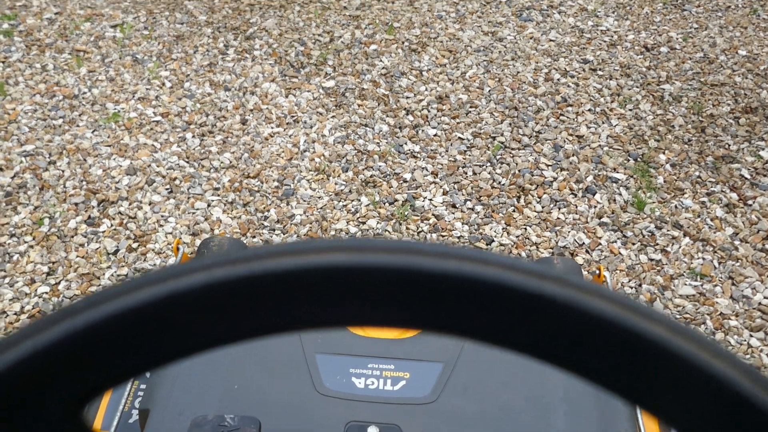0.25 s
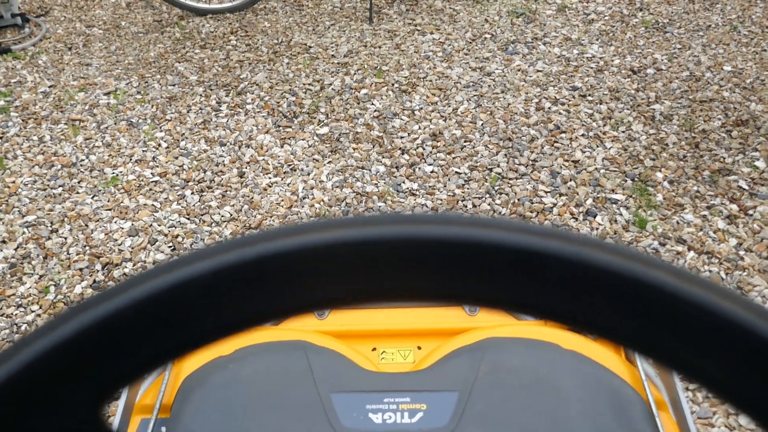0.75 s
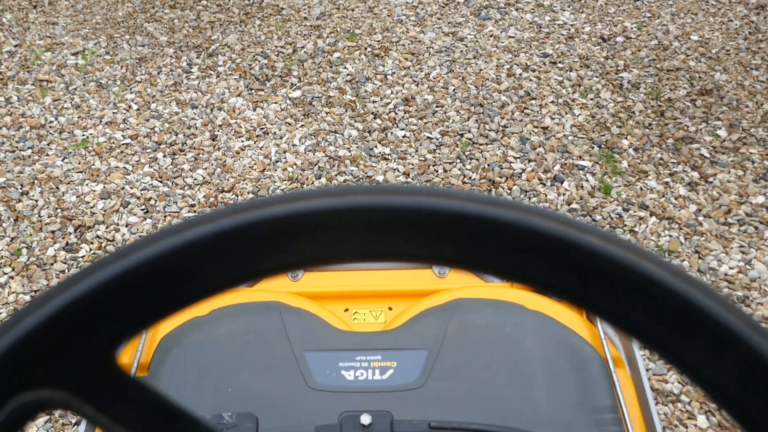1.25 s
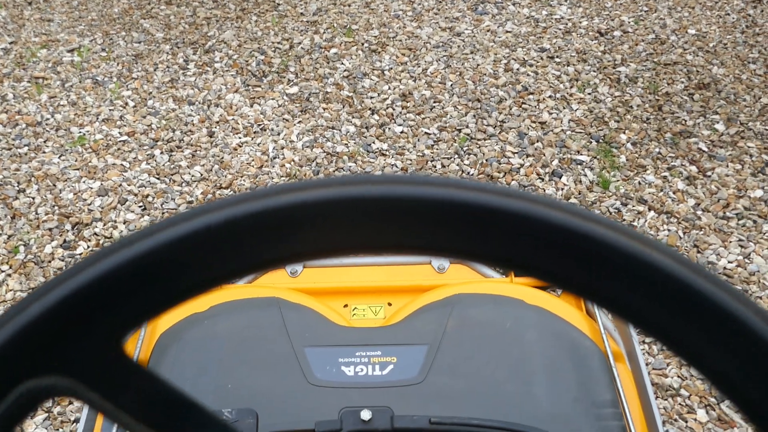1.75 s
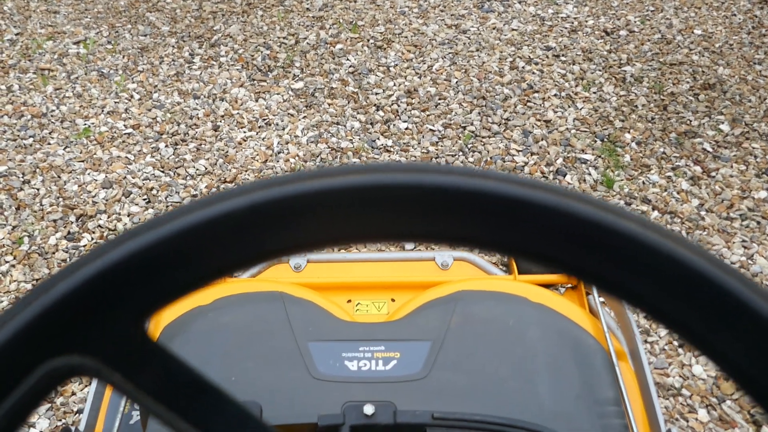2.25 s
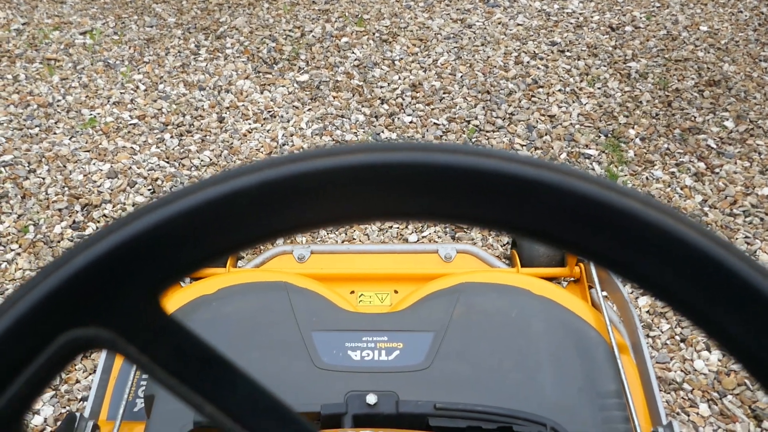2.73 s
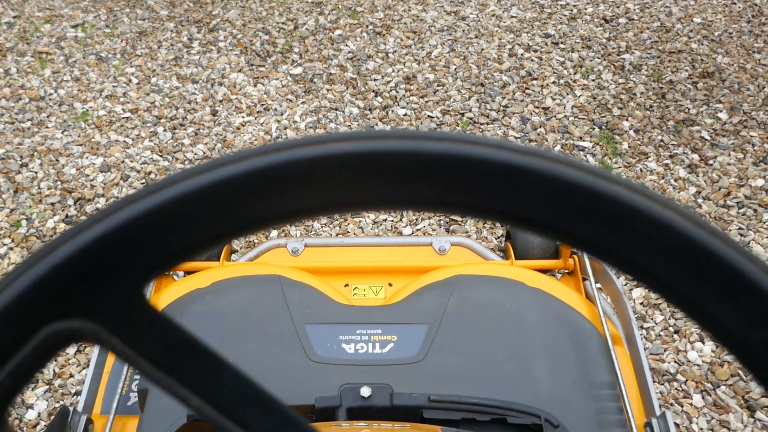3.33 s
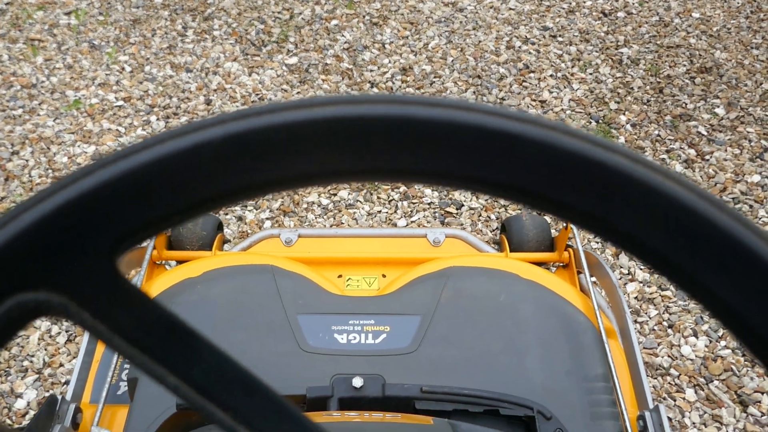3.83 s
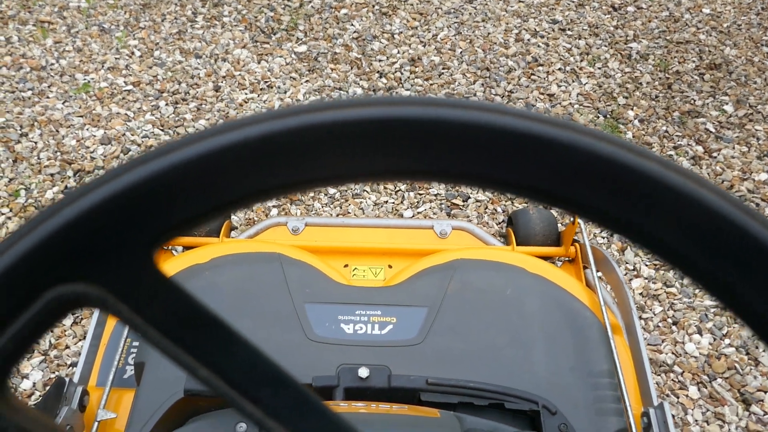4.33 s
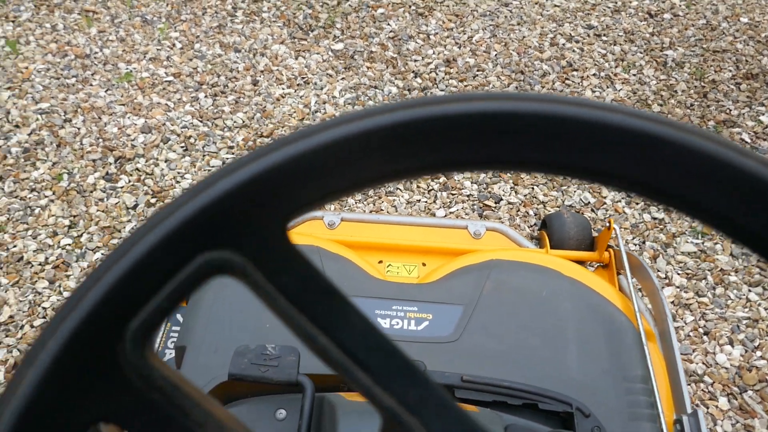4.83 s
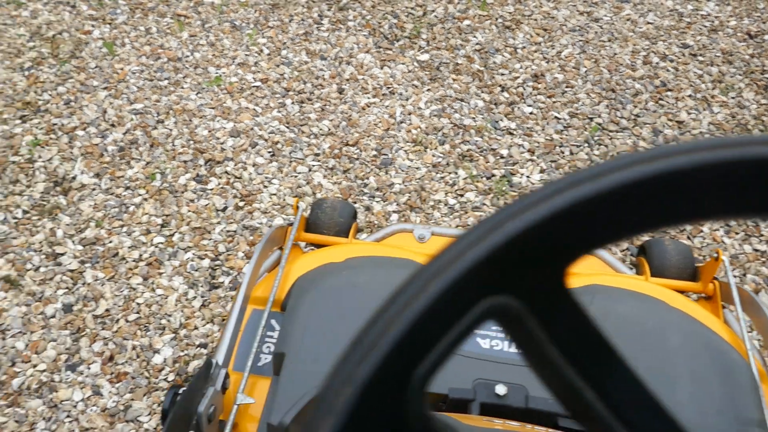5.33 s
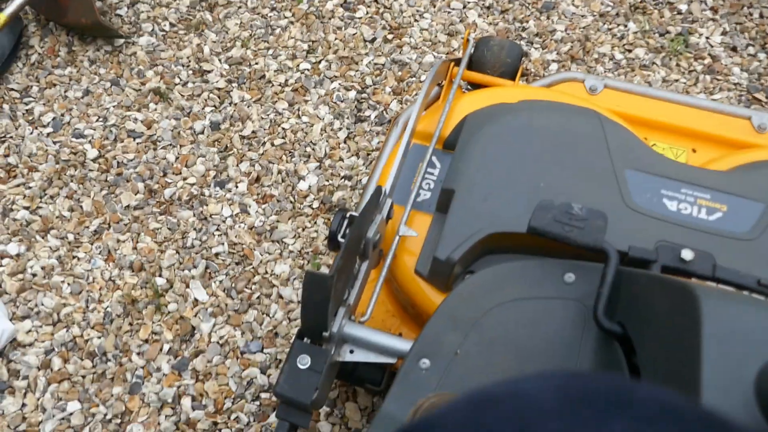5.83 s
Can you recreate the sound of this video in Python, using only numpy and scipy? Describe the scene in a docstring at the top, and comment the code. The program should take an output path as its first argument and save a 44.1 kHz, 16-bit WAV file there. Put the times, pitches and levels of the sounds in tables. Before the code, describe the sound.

After a few hollow knocks, a small petrol ride-on mower cranks, catches, idles and speeds up, chugging and clattering.

```python
"""A gravel yard, from the seat of a standing ride-on mower. The driver knocks about on the controls,
the starter grinds, and the one-cylinder petrol engine catches, idles, then pulls up to working speed
in two steps. Each cycle is a low intake gulp and a ringing exhaust beat, over clatter, rattling covers,
a belt hum and a hiss of air. Near the end the driver leans out to the left with a gritty rustle,
and the beat grows fainter."""
import sys
import numpy as np
from scipy import signal
from scipy.fft import rfft, irfft
from scipy.io import wavfile
from scipy.ndimage import uniform_filter1d

SR = 44100
rng = np.random.default_rng(int(sys.argv[2]) if len(sys.argv) > 2 else 0)


def wav_out(sig):
    """Save sig, one row per channel (or a flat mono array), as 16-bit PCM at SR to the path in sys.argv[1]."""
    wavfile.write(sys.argv[1], SR, np.round(np.clip(np.atleast_2d(sig).T, -1, 1) * 32767).astype(np.int16))


N = 268128
TIME = np.arange(N) / SR
BINS = np.fft.rfftfreq(N, 1 / SR)
KEY_S = 1.555  # starter engages


def gain_of(db):
    """Decibels to a factor."""
    return 10 ** (np.asarray(db) / 20)


def unit_rms(x):
    """Scales to an rms of one."""
    return x / np.sqrt(np.mean(x ** 2) + 1e-20)


def over_hz(points):
    """A curve over log frequency, at every bin."""
    hz, value = np.transpose(points)
    return np.interp(np.log(BINS + 1), np.log(hz + 1), value)


def level(points):
    """Gain over time from a curve in dB."""
    return gain_of(np.interp(TIME, *np.transpose(points)))


def ramp(start_s, length_s):
    """Climbs from zero to one and holds."""
    return np.clip((TIME - start_s) / length_s, 0, 1)


def leaning():
    """The driver's lean, 0 upright to 1 leaning out."""
    return ramp(5.39, 0.44)


def sides(db):
    """Left and right gains, mean one; positive dB is left."""
    pair = gain_of(np.array([db, -db]).reshape(2, -1) / 2)
    return pair / pair.mean(0)


def filtered(x, response):
    """Applies one gain per bin."""
    return irfft(rfft(x) * response, N)


def low_cut(x, hz):
    """Rolls off the deep bass."""
    return filtered(x, (BINS / hz) ** 4 / np.sqrt(1 + (BINS / hz) ** 8))


def band(hz, width_hz, shape=N):
    """Unit-rms noise in a Gaussian band."""
    return unit_rms(filtered(rng.standard_normal(shape), np.exp(-((BINS - hz) / width_hz) ** 2)))


def wander(hz):
    """Unit-rms random drift, up to about this rate."""
    return band(0, hz)


# ear-to-ear likeness: freq_hz, coherence
COHERENCE = [(60, 0.51), (150, 0.83), (520, 0.86), (950, 0.55), (2380, 0.57), (5980, 0.12), (15000, 0.16)]

def noise(spectrum, coherence=COHERENCE):
    """Coloured stereo noise, partly alike; its mono mix has unit rms."""
    shared, apart = rfft(rng.standard_normal((2, N)))
    alike = over_hz(coherence)
    shared *= np.sqrt(1 + alike)
    apart *= np.sqrt(1 - alike)
    pair = irfft(np.array([shared + apart, shared - apart]) * gain_of(over_hz(spectrum)), N)
    return pair / pair.mean(0).std()


def add(mix, start_s, sound):
    """Mixes a sound in place."""
    part = mix[max(round(start_s * SR), 0):][:len(sound)]
    part += sound[:len(part)]


def ring(hz, swell_ms):
    """A soft blow into a cavity: the tone peaks at swell_ms and dies away."""
    t = np.arange(SR // 10) / SR
    age = t * 1000 / swell_ms
    return age ** 2 * np.exp(2 - 2 * age) * np.sin(2 * np.pi * hz * t)


def blows(rows, modes):
    """Hollow thuds, each ringing the same set of modes."""
    out = np.zeros(N)
    for start_s, db, hz, swell_ms in rows:
        for pitch_ratio, mode_db, swell_ratio in modes:
            add(out, start_s, gain_of(db + mode_db) * ring(hz * pitch_ratio, swell_ms * swell_ratio))
    return out


def bursts(rows, rise_ms):
    """Envelope of impacts: fast rise, exponential decay."""
    out = np.zeros(N)
    ms = np.arange(SR // 4) * 1000 / SR
    attack = 1 - np.exp(-(ms / rise_ms) ** 2)
    for start_s, db, decay_ms in rows:
        add(out, start_s, gain_of(db) * attack * np.exp(-ms / decay_ms))
    return out


def spells(rows):
    """Envelope of sounds that rise, hold and fade."""
    return sum(gain_of(db) * (ramp(start_s, rise_s) - ramp(start_s + rise_s + hold_s, fade_s))
               for start_s, db, rise_s, hold_s, fade_s in rows)


# idle, two throttle steps, governor hunting: time_s, firing_hz
SPEED = [(2.13, 17.27), (2.3, 18.25), (2.9, 18.57), (3.2, 18.3), (3.62, 18.65), (3.92, 22.04),
         (4.15, 22.12), (4.52, 25.2), (4.87, 24.75), (5.05, 25.29), (5.3, 24.7), (5.5, 25.02),
         (6.08, 24.93)]
CATCH_S = SPEED[0][0]

def speed():
    """Firing rate in Hz at every sample."""
    return np.interp(TIME, *np.transpose(SPEED))


# firing rates: idle_hz, pulling_low_hz, pulling_high_hz, working_hz
STAGES_HZ = [18.6, 21.2, 22.8, 24.8]

def by_stage(stage_db, power=2):
    """Blends idle, pulling and working levels by speed; a higher power fades out sooner."""
    idle, pulling, working = gain_of(stage_db) ** (1 / power)
    return np.interp(speed(), STAGES_HZ, [idle, pulling, pulling, working]) ** power


def engine_gain(idle_db=0, fresh_db=1.5, octave_db=0.5, pull_db=-1, lean_db=-2.5, settle_s=0.82):
    """Settles after the start, follows speed, acceleration and lean; defaults are the beat's."""
    rate_hz = speed()
    fresh = np.exp(-np.maximum(TIME - CATCH_S, 0) / settle_s)
    octaves = np.log2(rate_hz / STAGES_HZ[0])
    pull = uniform_filter1d(np.gradient(rate_hz), size=SR // 10)
    db = idle_db + fresh_db * fresh + octave_db * octaves + pull_db * pull / pull.max()
    return gain_of(db + lean_db * leaning()) * ramp(KEY_S, 0.0021)


def bump(cycles, phase, width):
    """A bump of height one, once per engine cycle."""
    return np.exp(-(np.sin(np.pi * (cycles - phase)) / (np.pi * width)) ** 2) * (cycles > 0)


def strikes(cycles, rows, cycle_spread_db, strike_spread_db, jitter_ms):
    """Blows that recur each cycle, uneven in strength and timing."""
    out = np.zeros(N)
    count = int(cycles[-1]) + 1
    chance = rng.standard_normal((count, len(rows) + 2))
    strength = gain_of(cycle_spread_db * chance[:, -1:] + strike_spread_db * chance[:, :-2])
    late_s = jitter_ms * chance[:, -2] / 1000
    for k, (phase, hz, swell_ms, *stage_db) in enumerate(rows):
        starts_s = np.interp(np.arange(count) + phase, cycles, TIME) + late_s
        gains = np.interp(starts_s, TIME, by_stage(stage_db)) * strength[:, k]
        tone = ring(hz, swell_ms)
        for start_s, gain in zip(starts_s, gains):
            add(out, start_s, gain * tone)
    return out


# still yard plus microphone hiss: freq_hz, level_db
BACKGROUND_SPECTRUM = [(18, -48), (30, -29), (102, -0.5), (341, -4.5), (467, 2), (561, -4), (709, 3.5),
                       (874, -6.5), (2130, -8.5), (2760, -21.5), (3980, -28), (4780, -24), (7860, -31.5),
                       (10200, -22.5), (12500, -30.5), (15500, -31)]
# ear-to-ear likeness: freq_hz, coherence
BACKGROUND_COHERENCE = [(60, 0.67), (240, 0.41), (950, 0.056), (3770, 0.32), (15000, 0.45)]
# balance, microphone hiss on the left: freq_hz, left_minus_right_db
BACKGROUND_BALANCE = [(300, -0.5), (600, 9), (1000, -2.5), (1800, -6), (4000, 1), (8000, 16), (13000, 9)]

def background(level_db=-50, waver_db=1.5):
    """Quiet wavering outdoor background, with faint microphone hiss on the left."""
    bed = filtered(noise(BACKGROUND_SPECTRUM, BACKGROUND_COHERENCE), sides(over_hz(BACKGROUND_BALANCE)))
    return bed * gain_of(level_db + waver_db * wander(23))


# weight shifts: start_s, level_db, rise_s, hold_s, fade_s
GROANS = [(.09, -41, 0.014, 0.078, 0.031)]

def seat(pitch_hz=235, width_hz=45, overtone_db=-11):
    """Uneven slips ring the seat pan."""
    fundamental = np.exp(-((BINS - pitch_hz) / width_hz) ** 2)
    overtone = gain_of(overtone_db) / (1 + ((BINS - 1.54 * pitch_hz) / (3 * width_hz)) ** 2)
    groan = unit_rms(filtered(rng.standard_normal(N), fundamental + overtone))
    return low_cut(groan * spells(GROANS), hz=90)


# soft rubs: centre_s, level_db, pitch_hz, half_length_s
SCUFFS = [(0.147, -50, 1210, 0.068), (0.59, -52, 1330, 0.13), (0.79, -46.5, 1980, 0.025),
          (0.863, -52, 1300, 0.14), (1.153, -51, 1980, 0.026), (1.24, -58, 1280, 0.11),
          (1.267, -42, 2000, 0.017)]

def scuffs(width_hz=220):
    """Shoes and sleeves rub: narrow rustles that swell and fade."""
    return sum(gain_of(db) * band(hz, width_hz, (2, N)) * np.exp(-((TIME - centre_s) / half_s) ** 2)
               for centre_s, db, hz, half_s in SCUFFS)


# blows on the controls: start_s, level_db, pitch_hz, swell_ms
KNOCKS = [(.435, -42, 162, 3.9), (.517, -23, 354, 3), (.5218, -20, 234, 4.1), (.5547, -27, 364, 2.9),
          (.635, -37, 111.5, 13), (.686, -38.5, 295, 2.6), (.695, -39, 136, 7.2), (1.038, -33.5, 230, 3.1),
          (1.204, -41, 410, 6), (1.207, -45, 785, 7)]
# panel resonances: pitch_ratio, level_db, swell_ratio
PANEL_MODES = [(0.987, 2.5, 0.95), (0.72, -10, 3.2), (1.48, -13, 0.73), (1.865, -10, 1.55),
               (2.7, -27, 0.86)]

def knocks():
    """Hands and feet on the controls ring a panel."""
    return low_cut(blows(KNOCKS, PANEL_MODES), hz=55)


# metal impacts: start_s, level_db, decay_ms
CLACKS = [(.517, -35, 8.5), (1.557, -29, 13), (1.575, -20, 18), (1.803, -28, 8), (1.842, -22.5, 7.7),
          (1.917, -28, 7.2), (2.011, -22.5, 18.4), (2.086, -21, 13.5), (5.699, -28, 3.2)]
# struck metal: freq_hz, level_db
METAL_SPECTRUM = [(200, -21), (600, 4.5), (900, 1.5), (1450, 4), (1950, 0), (2600, -15), (3300, -21.5),
                  (5000, -30), (7000, -44), (15000, -46)]

def clacks():
    """Latch, starter gear and linkage strike metal on metal; near the end a stone hits the body."""
    return noise(METAL_SPECTRUM) * bursts(CLACKS, rise_ms=1.25)


def starter_brushes(start_s=1.5, length_s=0.48, level_db=-61):
    """The starter motor's brushes sing while it turns."""
    song = band(hz=4900, width_hz=650, shape=(2, N))
    return gain_of(level_db) * song * np.sin(np.pi * ramp(start_s, length_s))


# muffler gas: freq_hz, level_db
RUMBLE_SPECTRUM = [(25, -58), (70, -48), (100, -19), (130, -12), (200, -1.5), (270, -1), (370, -1.5),
                   (460, -6), (570, -2.5), (650, -12.5), (780, -27), (1100, -56.5)]

def muffler(cycles, puff=0.12, first_flow_db=-5, build_s=0.3, bark_stage_db=(-29, -28, -30)):
    """Turbulent gas, strongest with the exhaust valve open; the tailpipe barks as it opens."""
    flow = engine_gain(idle_db=-30, fresh_db=6.5, octave_db=8.5, pull_db=1.5, lean_db=-2)
    flow *= gain_of(first_flow_db * (1 - ramp(KEY_S, build_s)))
    valve_open = bump(cycles, phase=0.74, width=0.2)
    rumble = noise(RUMBLE_SPECTRUM) * flow * unit_rms(1 + puff * valve_open)
    bark = band(hz=575, width_hz=55) * bump(cycles, phase=0.634, width=0.057)
    return rumble + bark * by_stage(bark_stage_db) * engine_gain()


# valve gear and panels: freq_hz, level_db
CLATTER_SPECTRUM = [(380, -5), (650, -7.5), (747, 1), (830, -1.5), (952, -5.5), (1070, -3), (1230, -8.5),
                    (1350, -6), (1480, -8), (1640, -8), (1760, -11), (2530, -20), (2990, -30.5),
                    (3250, -28.5), (4020, -36), (6000, -43), (7800, -64), (13200, -120)]
# valve taps: phase_cycles, extra_gain
VALVE_TAPS = [(.02, 0.11), (.5, 0.15), (.61, 0.4), (.77, 0.09)]
# swell of clatter and rattles: time_s, level_db
CLATTER_LEVEL = [(2.2, -2), (2.75, 0), (4.15, -1.5), (4.95, 1), (5.25, -2), (5.42, 1.6), (5.8, -1),
                 (6.0, 2)]

def clatter(cycles, flutter_db=1.5, gear_db=-4, steps=1800):
    """Gears repeat one rasp each cycle, panels rattle, and valves tap in both."""
    taps = 1 + sum(extra * bump(cycles, phase, width=0.04) for phase, extra in VALVE_TAPS)
    panels = noise(CLATTER_SPECTRUM) * unit_rms(gain_of(flutter_db * wander(59)))
    rasp = rng.standard_normal(steps)[(cycles % 1 * steps).astype(int)] * (cycles > 0)
    gears = gain_of(gear_db) * unit_rms(filtered(rasp, gain_of(over_hz(CLATTER_SPECTRUM))))
    gain = engine_gain(idle_db=-35.5, fresh_db=5, octave_db=9, pull_db=0, lean_db=2.7)
    return gain * level(CLATTER_LEVEL) * unit_rms(taps * (gears + panels))


# air and cloth: freq_hz, level_db
HISS_SPECTRUM = [(1470, -17), (2500, -4), (2690, -3), (3020, -13), (4160, -15), (5290, -13), (5750, -21),
                 (6930, -14.5), (8880, -10.5), (10500, -11.5), (14000, -20), (15000, -23.5)]
# jacket rustles: start_s, level_db, rise_s, hold_s, fade_s
RUSTLES = [(4.71, -61.5, 0.041, 0.19, 0.29), (5.3, -43.5, 0.57, .4, .2)]

def air_and_jacket(air_db=-63.5, grit_db=1.5, scrape_db=1.2, upright_left_db=11, leaning_left_db=4.5):
    """Gritty hiss on the left: cooling air rushes and the driver's jacket scrapes unevenly."""
    grit = unit_rms(gain_of(grit_db * wander(500)))
    air = gain_of(air_db) * ramp(KEY_S, 0.01)
    jacket = spells(RUSTLES) * gain_of(scrape_db * wander(44))
    left_db = upright_left_db + (leaning_left_db - upright_left_db) * leaning()
    return noise(HISS_SPECTRUM) * (air + jacket) * grit * sides(left_db)


# gear rasp: freq_hz, level_db
STARTER_SPECTRUM = [(500, -5), (900, 6.5), (1900, -1), (2600, -5), (3000, -19), (3300, -15), (4150, -26),
                    (4470, -14), (4800, -20), (5700, -25), (6600, -20), (8300, -26), (9200, -16),
                    (12000, -23.5), (15500, -27)]
# gear bites: start_s, level_db, rise_s, hold_s, fade_s
BITES = [(1.571, -35.5, 0.0039, 0.016, 0.12), (1.768, -29, 0.018, 0.021, 0.098)]

def starter_gear(grit_db=1.5, teeth_hz=190, depth=0.2):
    """Teeth grind on the flywheel in uneven bites."""
    mesh_hz = teeth_hz * (1 + 0.1515 * wander(23.2))
    teeth = 1 + depth * np.sin(2 * np.pi * np.cumsum(mesh_hz) / SR)
    return noise(STARTER_SPECTRUM) * spells(BITES) * unit_rms(teeth * gain_of(grit_db * wander(260)))


# single barks: start_s, level_db, swell_ms
BARKS = [(1.575, -14, 10.3), (1.617, -19.5, 8.2), (1.688, -21, 10), (1.756, -15.5, 7.8),
         (1.797, -13.5, 10.2), (2.103, -19, 5.6), (2.218, -35, 3.1), (2.326, -13.5, 6.7), (5.53, -21, 4.4),
         (5.569, -21, 4.5)]
# tailpipe resonances: pitch_ratio, level_db, swell_ratio
PIPE_MODES = [(1, -1, 1), (1.32, -19.5, 2.7), (1.9, -24, 0.6)]

def barks(pipe_hz=577.5):
    """Uneven turns and hard firings ring the tailpipe."""
    return blows([(start_s, db, pipe_hz, swell_ms) for start_s, db, swell_ms in BARKS], PIPE_MODES)


# jolts: start_s, level_db, pitch_hz, swell_ms
THUMPS = [(1.5816, -14, 267, 14.7), (1.611, -18.5, 255, 6.4), (1.7235, -9.5, 232, 4.6),
          (1.743, -9, 209, 11), (1.8, -16, 150, 8.1), (1.829, -15, 305, 5.7), (1.8765, -8.5, 266, 7.2),
          (1.8833, -7.5, 203.4, 15), (1.9192, -14, 200, 11.5), (1.972, -12.5, 165, 8.8),
          (2.0132, -8.5, 146, 3.8), (2.038, -8.5, 191, 4.4), (2.0533, -13, 200, 16.5),
          (2.0863, -14.5, 149, 16.5), (2.22, -13, 320, 3.2), (3.701, -11, 192, 3.4), (3.733, -13, 342, 3.6),
          (3.753, -11.5, 208, 6.6), (5.208, -11, 287, 4.9), (5.249, -12, 301, 4.3), (5.545, -21, 312, 4.4)]
# frame resonances: pitch_ratio, level_db, swell_ratio
FRAME_MODES = [(0.996, 0, 0.96), (0.603, -12.5, 0.81), (1.49, -8.5, 0.24)]

def thumps():
    """Slow first turns and single hard firings thump the frame."""
    return blows(THUMPS, FRAME_MODES)


# gas pulses: phase_cycles, pitch_hz, swell_ms, idle_db, pulling_db, working_db
STROKES = [(.124, 154, 17.2, -29, -37.5, -28.5), (.135, 363, 6.4, -31, -32, -30),
           (.291, 167, 4.7, -10.7, -14.8, -16.8), (.297, 700, 2, -32, -45, -30.5),
           (.427, 426, 14.5, -29.5, -27.5, -40), (.458, 327, 5.7, -18.5, -20, -24.5),
           (.51, 198, 8.4, -24, -21, -50), (.512, 568, 6.3, -18.8, -15.1, -23.4),
           (.559, 264, 14.7, -29, -26, -27), (.592, 505, 18, -29, -31.5, -50)]

def beat(cycles):
    """Intake and exhaust ring airbox and muffler."""
    return strikes(cycles, STROKES, cycle_spread_db=0.5, strike_spread_db=0.5,
                   jitter_ms=0.092) * engine_gain()


# loose parts: phase_cycles, pitch_hz, swell_ms, idle_db, pulling_db, working_db
RATTLES = [(.02, 884, 7.9, -37, -36, -47), (.3, 1527, 5.7, -47, -34, -45), (.38, 1345, 4.6, -50, -47, -39),
           (.45, 1066, 7.6, -54, -36.5, -39.5), (.4, 1860, 18, -46.5, -47, -51),
           (.45, 2086, 11, -47, -48, -55), (0.499, 1609, 5, -43, -44, -41.5),
           (.93, 785, 1.7, -43, -47, -30), (.97, 1077, 3.8, -49, -40, -32.5)]

def rattles(cycles):
    """Covers and linkage chatter in time with the firing."""
    return strikes(cycles, RATTLES, cycle_spread_db=0.8, strike_spread_db=2,
                   jitter_ms=0.3) * level(CLATTER_LEVEL)


# belt hum: firing_multiple, idle_db, pulling_db, working_db
BELT_TONES = [(6.884, -39.5, -51, -64), (10.59, -51, -47, -33), (13.846, -30.5, -38, -34),
              (20.64, -25.5, -72, -44)]

def belt(cycles, flutter_db=1.3, slip_cycles=0.0045):
    """The drive hums at its own ratio to the crankshaft, slipping a little."""
    angle = 2 * np.pi * (cycles + slip_cycles * wander(6))
    hum = np.zeros(N)
    for multiple, *stage_db in BELT_TONES:
        flutter = gain_of(flutter_db * wander(3.7))
        hum += by_stage(stage_db, power=8) * np.sin(multiple * angle) * flutter
    return np.sqrt(2) * hum * np.clip(cycles / 2, 0, 1)


# frame and hood harmonics: firing_multiple, idle_db, pulling_db, working_db
DRONE_TONES = [(2, -68, -62, -54), (5, -48, -39, -52), (6, -60, -39, -42), (7, -60, -38, -60),
               (9, -32, -34.5, -24.8)]

def drone(cycles, intake_phase=0.4, lean_db=-0.8):
    """The crank shakes frame and hood; all harmonics line up on the intake stroke."""
    angle = 2 * np.pi * (cycles - intake_phase)
    tones = sum(by_stage(stage_db) * np.cos(multiple * angle) for multiple, *stage_db in DRONE_TONES)
    return -tones * gain_of(lean_db * leaning()) * np.clip(cycles, 0, 1)


# engine midrange: time_s, level_db
MID_LEVEL = [(3.75, 0), (4.2, 0.5), (4.35, 1), (4.5, -0.5), (4.85, 1.5), (5.13, -1), (5.46, -1.5),
             (5.55, 1.5), (5.68, 1.5), (5.78, -6), (5.88, 0.5), (6.08, -0.5)]

def surging(x, above_hz=260):
    """The midrange swells and sags while the bass holds."""
    mids = filtered(x, 1 - 1 / (1 + (BINS / above_hz) ** 8))
    return x + mids * (level(MID_LEVEL) - 1)


# ticks and scrapes: start_s, level_db, decay_ms
TICKS = [(3.84, -52, 32), (5.405, -40, 2.7), (5.588, -47, 18), (5.6942, -23, 0.81), (5.6995, -14.5, 1.07),
         (5.7455, -30, 1.2)]
# their colour: freq_hz, level_db
TICK_SPECTRUM = [(1000, -18), (2800, -4), (4200, -3.5), (6000, -6.5), (8000, -2.5), (10000, 2), (12000, -5),
                 (15000, -9)]

def ticks(left_db=8):
    """Sharp ticks and scrapes close by on the left."""
    return noise(TICK_SPECTRUM) * bursts(TICKS, rise_ms=0.67) * sides(left_db)


# engine balance: freq_hz, left_minus_right_db
ENGINE_BALANCE = [(60, -3.5), (150, -0.9), (280, -0.7), (560, -4), (1000, -10), (2000, -5.5), (4000, 0.5),
                  (8000, 10.5)]

def scene(swing_db=6.0):
    """Engine a little to the right; its clatter swings to the middle as the driver leans."""
    cycles = np.cumsum(speed() * (TIME >= CATCH_S)) / SR
    metal = (clatter(cycles) + clacks() + rattles(cycles)) * sides(swing_db * leaning())
    gas = surging(beat(cycles) + muffler(cycles))
    engine = low_cut(gas + thumps() + barks() + metal, hz=80) + belt(cycles) + starter_gear()
    engine = filtered(engine, sides(over_hz(ENGINE_BALANCE))) + drone(cycles)
    driver = knocks() + seat() + scuffs()
    return engine + starter_brushes() + air_and_jacket() + ticks() + background() + driver


def record(dry, edge_hz=15500):
    """A steep band limit."""
    low_pass = signal.firwin(511, edge_hz, window=("kaiser", 9), fs=SR)
    return signal.oaconvolve(dry, low_pass[None], "same")


dry = scene()
out = record(dry)
wav_out(out)
```